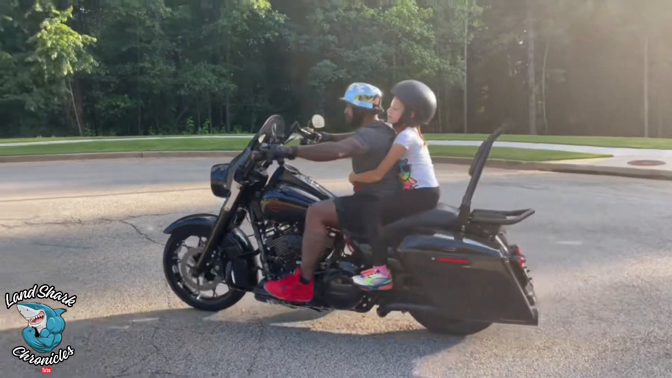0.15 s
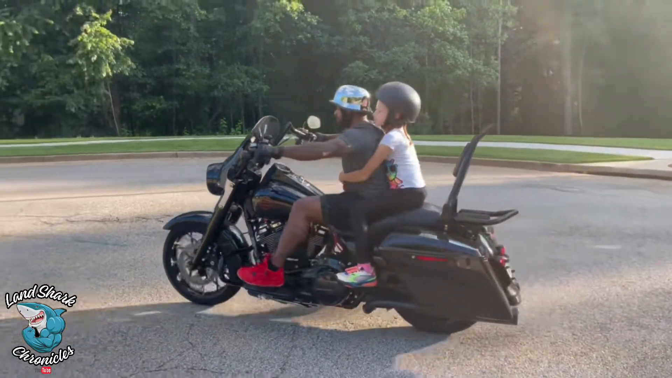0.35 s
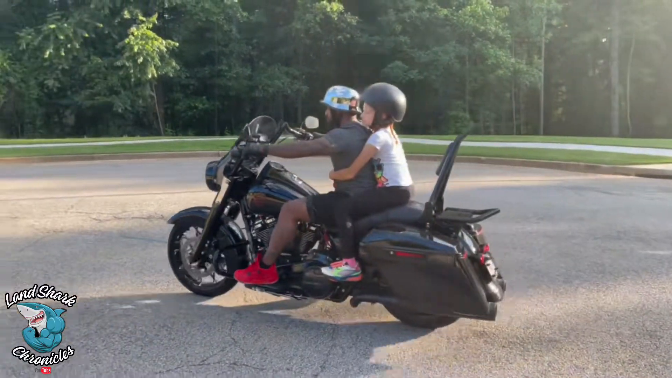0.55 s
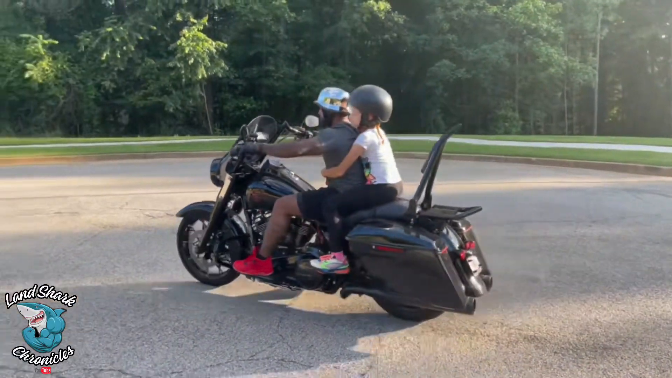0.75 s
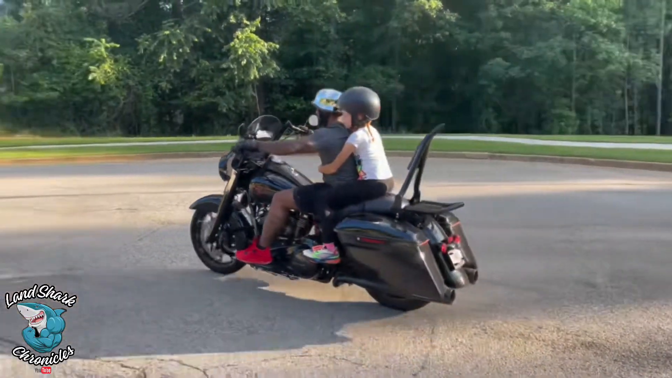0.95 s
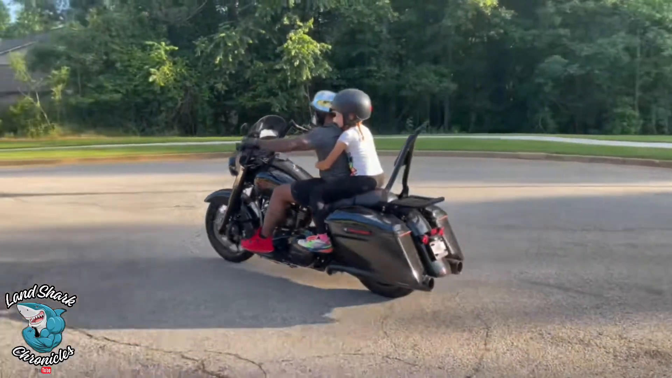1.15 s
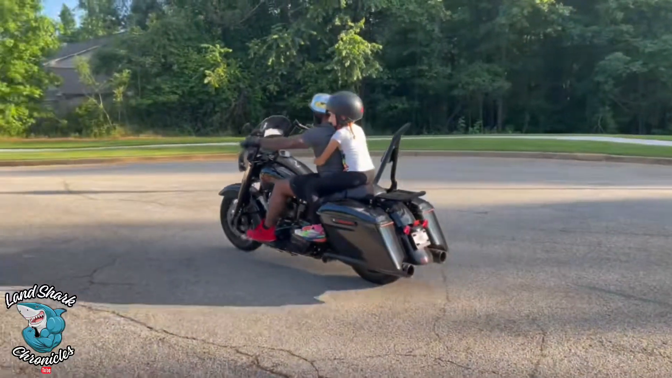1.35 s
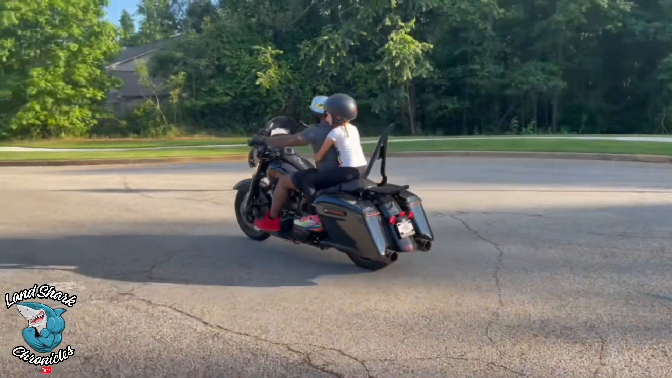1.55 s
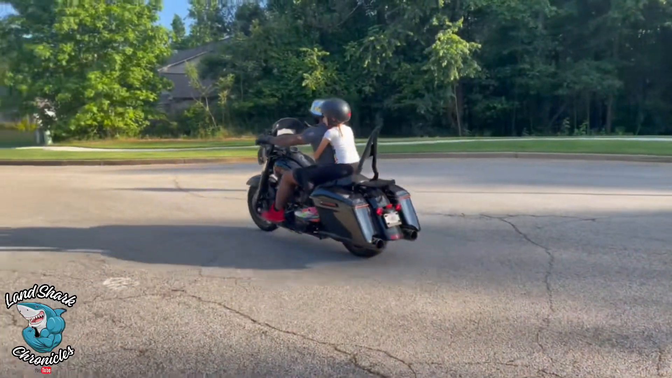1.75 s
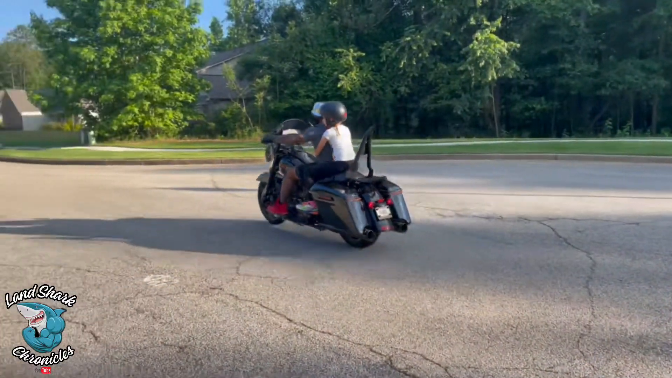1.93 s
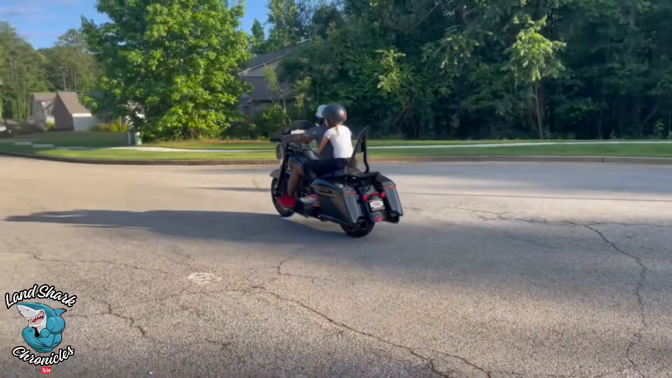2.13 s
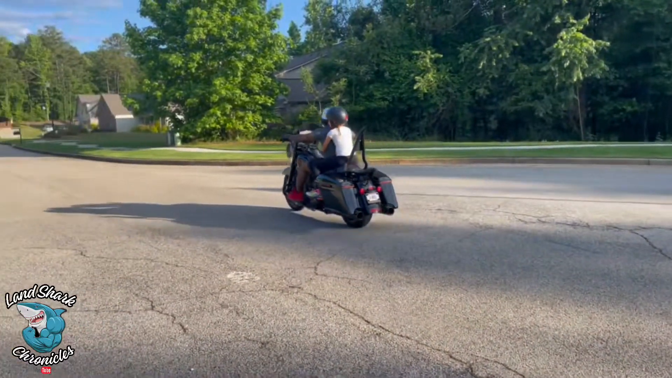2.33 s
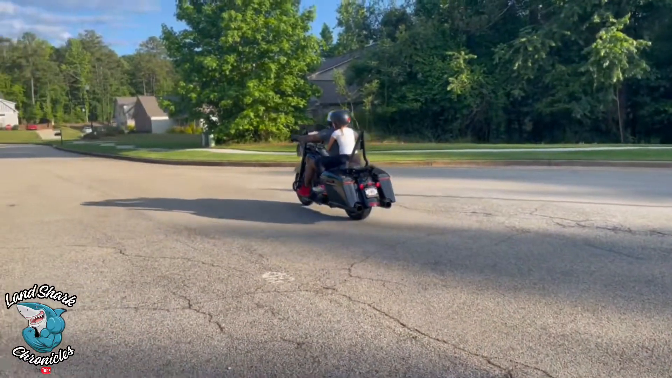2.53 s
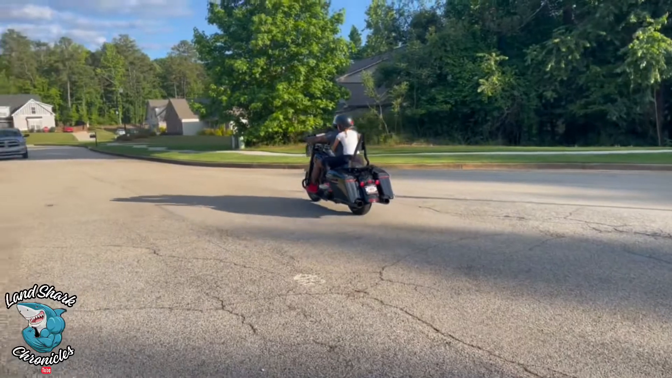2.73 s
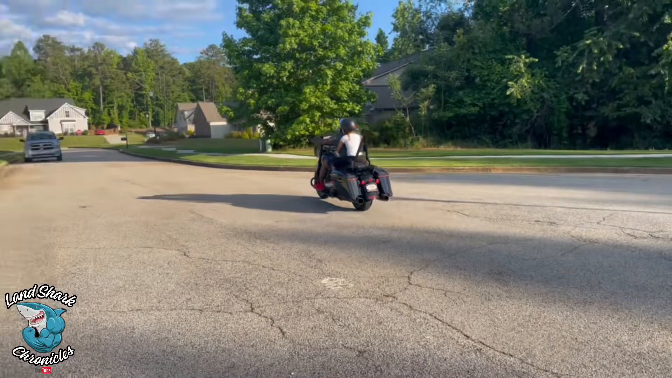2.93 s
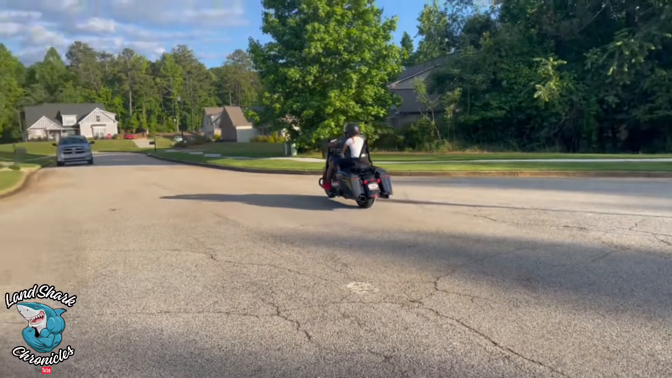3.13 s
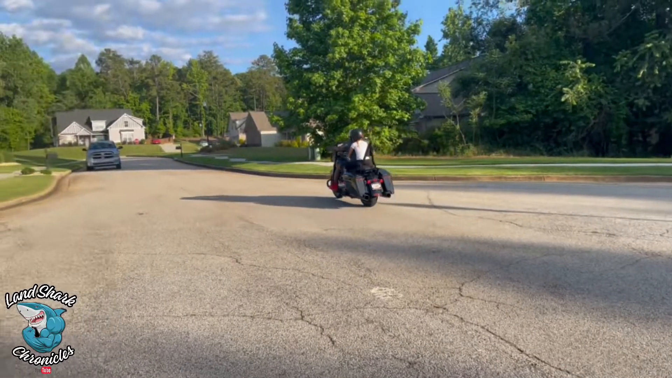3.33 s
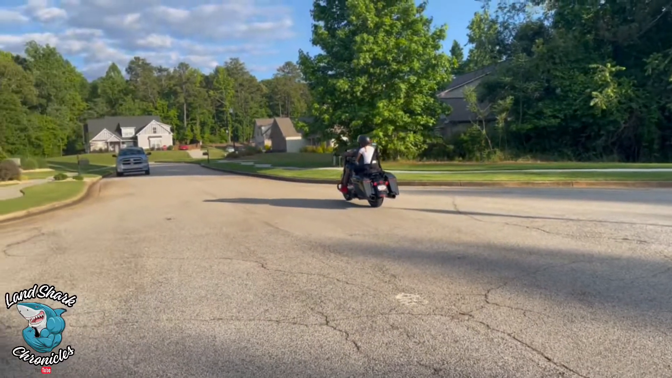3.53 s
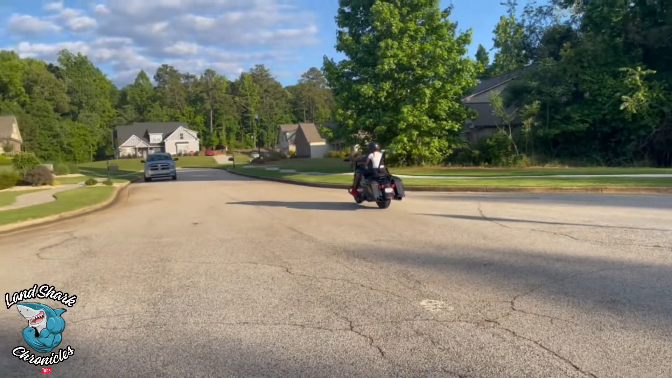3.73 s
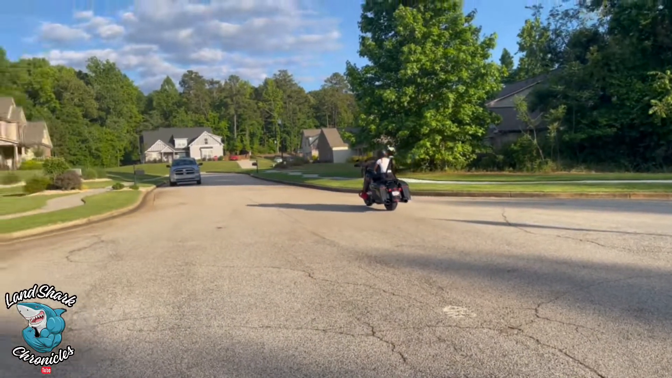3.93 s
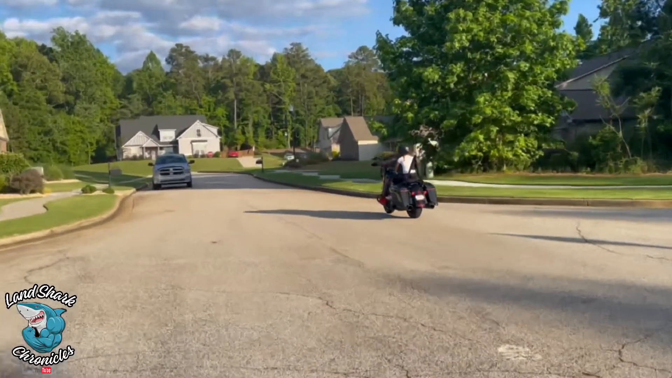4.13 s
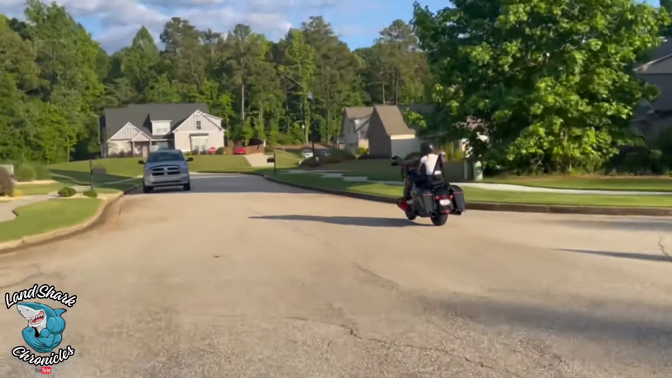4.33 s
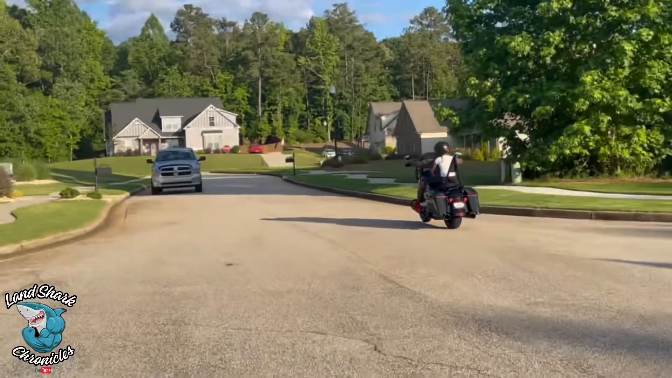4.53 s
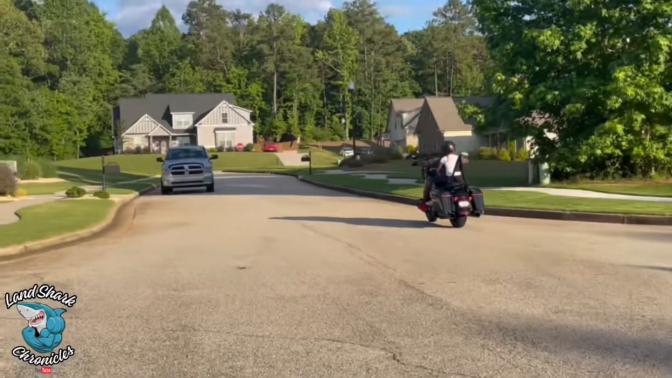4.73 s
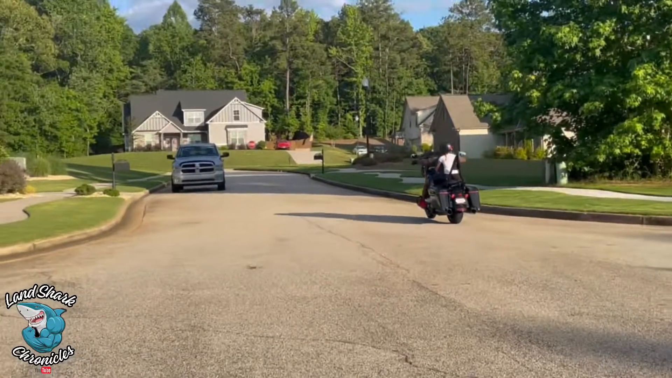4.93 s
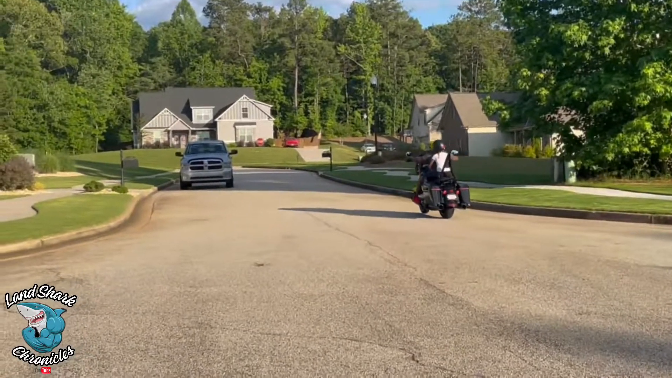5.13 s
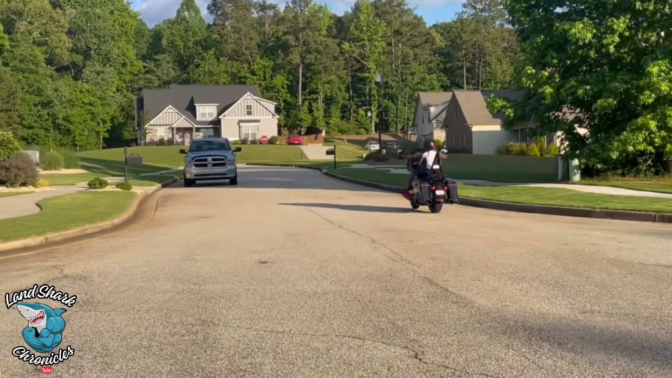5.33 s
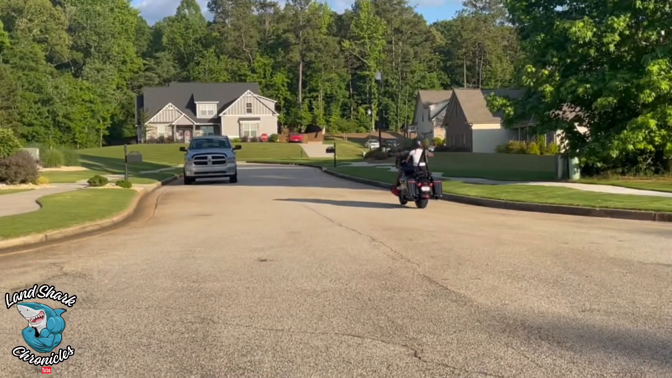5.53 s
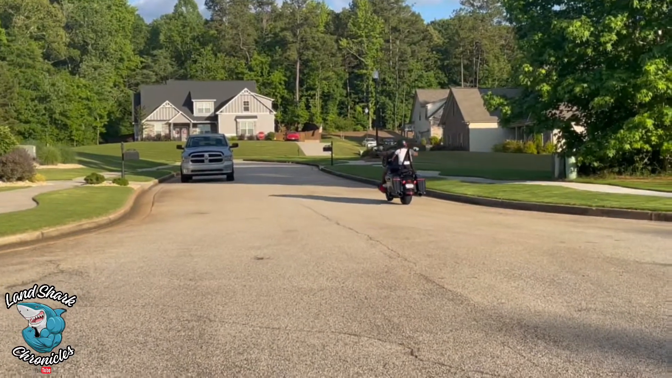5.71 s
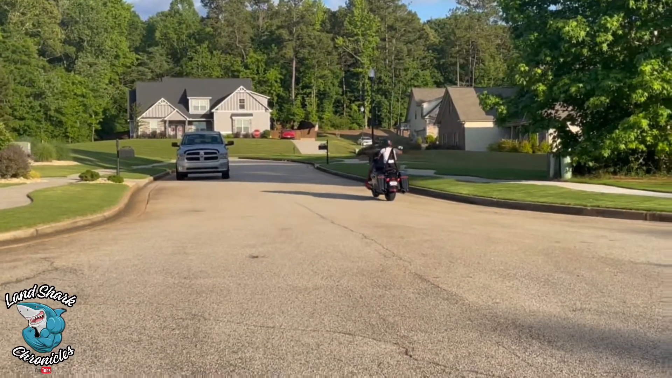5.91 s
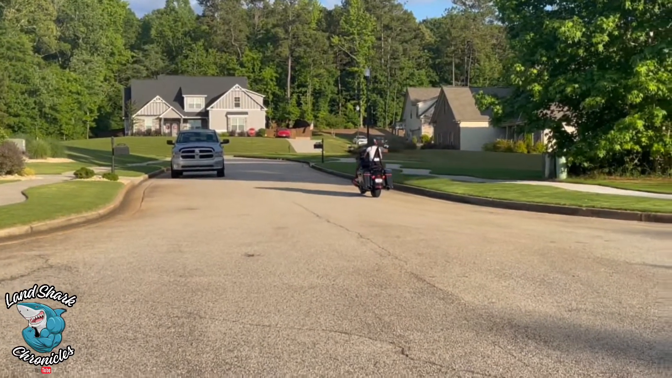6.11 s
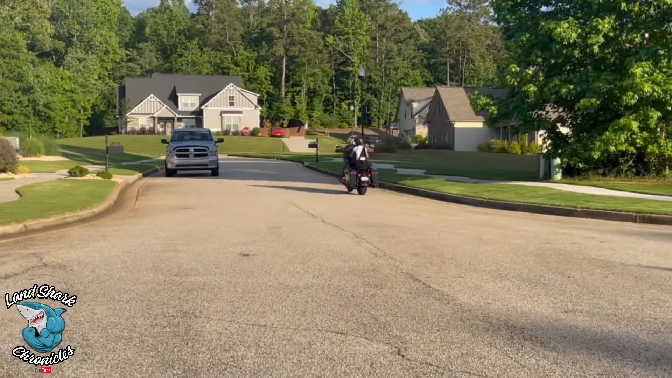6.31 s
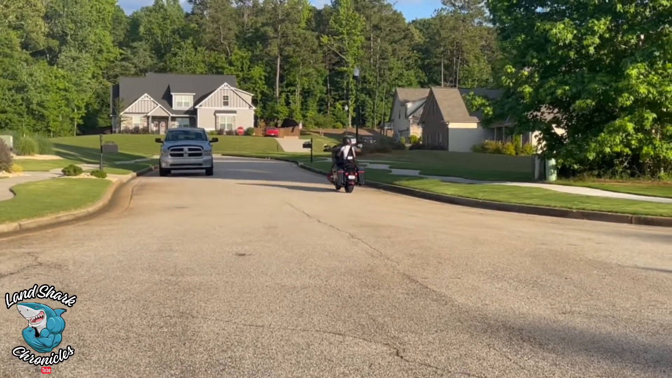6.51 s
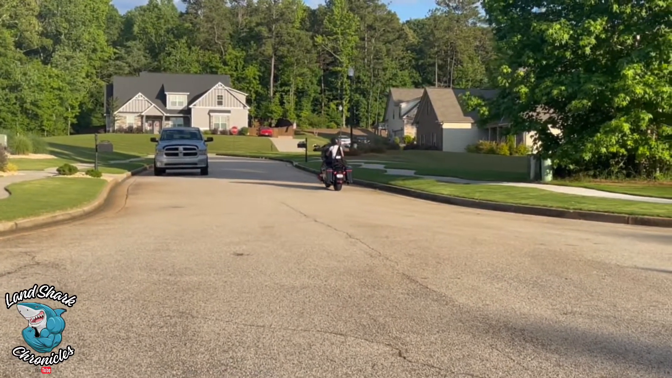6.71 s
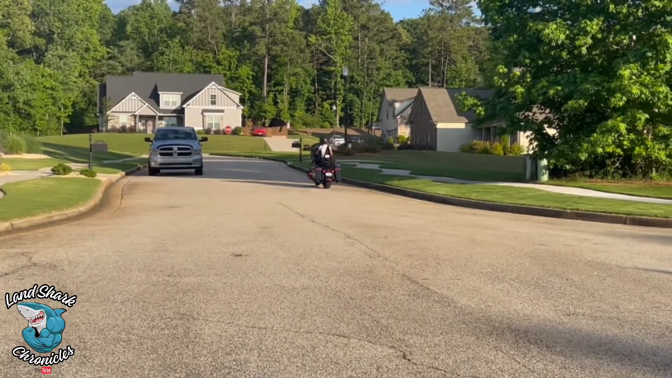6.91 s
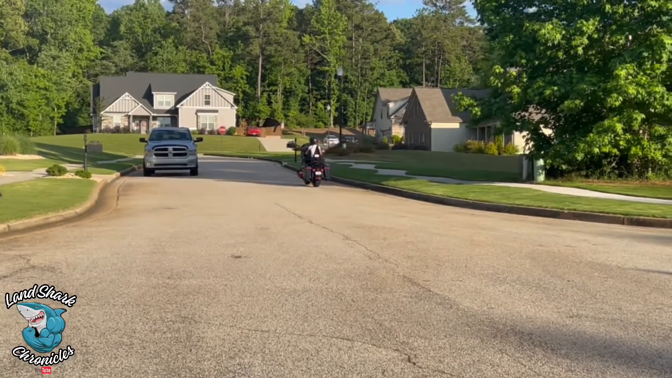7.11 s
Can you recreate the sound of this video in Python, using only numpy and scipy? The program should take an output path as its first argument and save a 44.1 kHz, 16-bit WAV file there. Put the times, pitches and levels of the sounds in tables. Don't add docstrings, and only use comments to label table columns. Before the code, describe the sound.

Outdoors on a quiet residential street, a heavy twin-cylinder motorcycle chugs in front of a small stereo microphone, then rides off. The loping low beat quickens into a hoarse, droning growl with exhaust hiss reflecting off asphalt and houses. After almost six seconds it drops off throttle, with two dull gearbox clunks and sharp crackling blips. Soft dove coos at left and a fast high bird trill join in.

```python
import sys
import numpy as np
from scipy import signal
from scipy.fft import rfft, irfft, next_fast_len
from scipy.io import wavfile
from scipy.ndimage import uniform_filter1d, map_coordinates

SR = 44100
rng = np.random.default_rng(int(sys.argv[2]) if len(sys.argv) > 2 else 0)


def volts_from_decibels(level):
    exponent = np.asarray(level, float) / 20
    return 10 ** exponent


def unload_audio(sound):
    columns = np.transpose(np.atleast_2d(sound))
    steps = np.round(np.clip(columns, -1, 1) * 32767)
    wavfile.write(sys.argv[1], SR, steps.astype(np.int16))


N = 315888
T = np.arange(N) / SR
SHUT_S, FIRST_BLIP_S = 5.87, 6.68


def unit(x):
    return x / np.sqrt(np.mean(x ** 2) + 1e-20)


def along(points, hz):
    f, v = np.transpose(points)
    return np.interp(np.log(hz + 1), np.log(f + 1), v)


def curves(rows):
    s, *columns = np.transpose(rows)
    return [np.interp(T, s, column) for column in columns]


def ramp(start_s, takes_s):
    return np.clip((T - start_s) / takes_s, 0, 1)


def filtered(x, response):
    m, fade = next_fast_len(N + SR // 2), np.hanning(8192)
    after = x[..., :-4097:-1] * fade[4096:]
    before = x[..., 4095::-1] * fade[:4096]
    gap = np.zeros(x.shape[:-1] + (m - N - 8192,))
    ends = np.concatenate([x, after, gap, before], axis=-1)
    return irfft(rfft(ends) * response(np.fft.rfftfreq(m, 1 / SR)), m)[..., :N]


def noise(spectrum, channels=1):
    return unit(filtered(rng.standard_normal((channels, N)), lambda hz: volts_from_decibels(along(spectrum, hz))))


def patchy(x, depth_db, size):
    z = signal.stft(x, nperseg=512)[2]
    field = uniform_filter1d(rng.standard_normal(z.shape), size=size, axis=0)
    field = uniform_filter1d(field, size=9, axis=1)
    return unit(signal.istft(z * volts_from_decibels(depth_db * unit(field)), nperseg=512)[1][:N])


def resonance(f, hz, width):
    return (1j * f * width / (hz * hz - f * f + 1j * f * width)) ** 2


# frequency in Hz, level in dB per Hz.
AIR_COLOUR = [(220, -51), (400, -3), (900, -15.5), (1600, -13.5), (2800, -22), (2860, -8), (2920, -24),
              (4200, -33), (6200, -24), (8500, -31), (11400, -41), (13200, -62)]


def air():
    mid, side = noise(AIR_COLOUR, channels=2)
    return volts_from_decibels(-50) * np.array([mid + 0.062 * side, mid - 0.082 * side])


# time in seconds, pitch in Hz, level in dB.
DOVE_CALLS = [
    [(2.79, 840, -45), (2.85, 900, -37), (2.91, 960, -52)],
    [(3.39, 750, -54), (3.5, 640, -49), (3.58, 730, -44), (3.68, 730, -41)],
    [(5.6, 720, -56), (5.66, 660, -50), (5.72, 600, -45)],
]


def dove():
    out = np.zeros(N)
    for call in DOVE_CALLS:
        hz, db = curves(call)
        sounding = (T > call[0][0]) * (T < call[-1][0])
        out += volts_from_decibels(db) * sounding * np.sin(2 * np.pi * np.cumsum(hz) / SR)
    return out * volts_from_decibels([[3], [-9]])


# time in seconds, level in dB.
TRILL_LEVEL = [
    (4.75, -62),
    (5.3, -55.5),
    (5.9, -52.5),
    (6.6, -52.5),
    (7.16, -46.5),
]


def trill():
    beat = (T - 6.275) / .0488
    luck = rng.standard_normal((160, 2))[np.floor(beat).astype(int) % 160]
    through = np.clip(beat % 1 / .42, 0, 1)
    hz = (5000 + 2400 * through) * (1 + .015 * luck[:, 0])
    shape = np.sin(np.pi * through ** 0.83) * (T > TRILL_LEVEL[0][0])
    return volts_from_decibels(curves(TRILL_LEVEL)[0] + 1.6 * luck[:, 1]) * shape * np.sin(2 * np.pi * np.cumsum(hz) / SR)


def trill_echoes(bird):
    return sum(volts_from_decibels(db) * np.roll(bird, round(s * SR)) for s, db in [(.0013, -27), (.0031, 4), (.007, -22)])


# frequency in Hz, seconds to fall by 60 dB.
STREET_DECAY = [(60, 1), (300, 0.69), (2000, 0.029), (10000, 0.035)]
# frequency in Hz, level in dB.
SHARED_ECHO = [(60, -26), (250, -20), (600, -12), (3000, -10), (12000, -13)]
# frequency in Hz, level in dB.
APART_ECHO = [(60, -75), (250, -30), (600, -20), (1200, -19), (3000, -5), (5000, -3), (7000, -2),
              (8800, 3.5), (9800, -7.5), (10500, -22), (11300, -16), (12500, -8)]


def street(x):
    hz, t, z = signal.stft(rng.standard_normal((2, SR // 2)), SR, nperseg=256)
    decay = volts_from_decibels(-60 * t / along(STREET_DECAY, hz)[:, None])
    tails = signal.istft(z * decay, SR, nperseg=256)[1]
    late = np.pad(x, (300, 0))[None]
    both = signal.fftconvolve(late, tails / np.linalg.norm(tails[0]), axes=1)[:, :N]
    shared = filtered(both[0], lambda f: volts_from_decibels(along(SHARED_ECHO, f)))
    apart = filtered(both[1], lambda f: volts_from_decibels(along(APART_ECHO, f)))
    return shared + np.array([apart, -apart])


def metres():
    return 3.32 + 1.9 * T ** 2 / 2


def spread_db():
    return -20 * np.log10(metres() / 3.32)


def seen():
    return 1 / (1 + np.exp((metres() - 19) / 3))


def shut():
    return ramp(SHUT_S, .08)


def blipped():
    return ramp(FIRST_BLIP_S, 0.015)


def engine_db():
    coasting_s = np.clip(T - SHUT_S, 0, FIRST_BLIP_S - SHUT_S)
    return -15.5 + 0.11 * spread_db() - shut() - 15.5 * coasting_s + 4.5 * blipped()


# time in seconds, frequency in Hz.
ECHO_PEAK_HZ = [(0, 1690), (1, 1950), (1.5, 2590), (2, 3010), (2.5, 4000), (2.8, 4560), (3.2, 5530),
                (3.7, 5900), (4.2, 8700), (5, 11000)]


def off_asphalt(x, share):
    lag = SR / curves(ECHO_PEAK_HZ)[0]
    echo = map_coordinates(x, [np.arange(N) - lag])
    steep = np.clip(lag / 16, 0, 1)
    out = x + share * seen() * (steep * uniform_filter1d(echo, size=5) + (1 - steep) * echo)
    treble = filtered(out, lambda hz: 1 / (1 + (8500 / (hz + 1)) ** 6))
    return out - np.clip(0.044 * (metres() - 49), 0, 0.17) * treble


# time in seconds, level in dB.
WHIR_LEVEL = [
    (4.2, -60),
    (4.9, -51.5),
    (5.5, -54),
    (6.3, -57),
]


def whir():
    colour = [(2200, -27), (3300, -1), (5500, -2), (7500, -16), (13000, -83)]
    return volts_from_decibels(curves(WHIR_LEVEL)[0]) * noise(colour)[0]


# time in seconds, level in dB, seconds to fall by 60 dB.
CLUNKS = [
    (6.189, -37.5, 0.25),
    (6.786, -39.5, 0.14),
]


def clunks():
    colour = [(250, -29), (500, 8), (2500, -1.0), (5000, -10.5), (13000, -94)]
    knocks = sum(volts_from_decibels(db - 60 * np.abs(T - s) / np.where(T > s, t60, .06)) for s, db, t60 in CLUNKS)
    return knocks * noise(colour)[0]


# time in seconds, engine cycles per second.
ENGINE_SPEED = [(0.0, 8.07), (0.18, 8.68), (0.54, 7.49), (0.72, 8.06), (1.44, 7.56), (1.8, 8.28),
                (2.85, 10.06), (3.3, 10.42), (4.2, 11.78), (4.65, 12.31), (5.88, 13.35), (6.25, 10.52),
                (6.6, 8.77), (6.8, 9.5), (7.0, 8.85), (7.17, 9.82)]


def revs():
    return curves(ENGINE_SPEED)[0]


def firings():
    cycle = -.445 + np.cumsum(revs()) / SR
    rear_share = 157.5 / 360
    return [np.flatnonzero(np.diff(np.floor(cycle - share), prepend=-1 - (share > 0)))
            for share in (0, rear_share)]


def gas_puffs(fires):
    gate, t = np.zeros(N), np.arange(2000) / SR
    rear_db = -0.5 - 4 * (1 - seen()) * (T < SHUT_S)
    for at, db in zip(fires, (0, rear_db[fires[1]])):
        gate[at] = volts_from_decibels(db + 1.2 * rng.standard_normal(len(at)))
    puff = t ** 2 * np.exp(-t / .0022)
    return unit(signal.fftconvolve(gate, puff)[200:N + 200])


# frequency in Hz, level in dB per Hz.
ROAR_COLOUR = [(220, 14.5), (380, -5), (480, -1), (600, 0), (730, 1.5), (900, -3.5), (1080, -0.5),
               (1450, -2), (1750, 1), (2050, -5), (3130, -8.5), (3480, -15), (6210, -22), (9130, -23),
               (10100, -13.5), (11200, -15), (12100, -26.5), (13200, -80)]


def roar(gate):
    level_db = engine_db() - 11 + 0.55 * spread_db() - 4 * shut()
    rush = patchy(noise(ROAR_COLOUR)[0], depth_db=1, size=8)
    return volts_from_decibels(level_db) * off_asphalt((1 + .4 * gate) * rush, share=.4)


# frequency in Hz, width in Hz, level in dB.
TIP_MODES = [(1950, 360, 5), (2876, 350, 4.5), (3210, 97, 3), (3790, 270, 1.5), (4780, 200, -3),
             (6270, 180, -14)]


def tips(gate):
    body = lambda f: sum(volts_from_decibels(db) * resonance(f, hz, width) for hz, width, db in TIP_MODES)
    return unit(filtered(gate * rng.standard_normal(N), body))


# start in seconds, length in seconds, level of the spit in dB.
THROTTLE_BLIPS = [
    (6.68, .1, 18),
    (6.78, .16, 13),
    (6.94, .07, 15),
    (7.01, .05, 20),
    (7.06, .05, 21),
    (7.11, .1, 18),
]


def spitting_db():
    shut_db = -11
    blips = sum((db - shut_db) * (T > s) * (T < s + length) for s, length, db in THROTTLE_BLIPS)
    turning = -31.5 * (1 + np.cos(np.pi * ramp(0, 1.91))) / 2
    return -32 + turning + spread_db() + 0.5 * (1 - seen()) + shut_db * shut() + blips


# frequency in Hz, level in dB per Hz.
NEAR_SPIT = [(300, -30), (480, 2.5), (600, -19), (740, 11), (1000, -65), (1800, -7), (2250, -9), (2800, 2),
             (3200, 6.5), (3450, -11.5), (3700, 1.5), (4200, -6), (5000, 1.5), (5600, -2.5), (6200, -0.5),
             (8000, -9), (11000, -2.5), (12200, -10), (13000, -31), (13500, -86)]
# frequency in Hz, level in dB per Hz.
FAR_SPIT_COLOUR = [(300, -36), (500, 19), (1100, -17), (1700, -10), (2900, 4.5), (3600, -4), (5400, 2),
                   (6500, -2), (8500, -9), (11500, -16), (13000, -40), (13500, -89)]
# time in seconds, extra spit in dB, ring of the pipe tips in dB.
PIPE_AIM = [(0, -15, -50), (.7, 3, -33), (1.05, 0, -8.5), (1.5, -6, -1.5), (2.6, -1.5, -4.5), (3.2, 2, -18),
            (3.6, 2, -12), (3.8, -1.5, -22), (4.7, -2, -10), (5, 3, -16), (5.4, -1, -9), (5.85, 2, -20),
            (5.95, -6, -42)]


def spit(gate):
    gas = np.sqrt(seen()) * noise(NEAR_SPIT)[0] + np.sqrt(1 - seen()) * noise(FAR_SPIT_COLOUR)[0]
    gas = gate * patchy(gas, depth_db=2.5, size=3)
    bounced = off_asphalt(off_asphalt(gas, share=.8), share=.5)
    aim_db, ring_db = curves(PIPE_AIM)
    ring = volts_from_decibels(-32 + spread_db() + ring_db) * off_asphalt(tips(gate), share=0.99)
    return volts_from_decibels(aim_db + spitting_db() + 0.47) * bounced + ring


def ringing(fires, modes):
    m = next_fast_len(N + SR // 2)
    f = np.fft.rfftfreq(m, 1 / SR)
    uneven_db = .4 + .6 * shut()
    out = 0
    for hz, width, front_db, rear_db, front_ms, rear_ms in modes:
        blows = np.zeros(N)
        for at, db, ms in zip(fires, (front_db, rear_db), (front_ms, rear_ms)):
            luck = uneven_db[at, None] * rng.standard_normal((len(at), 2))
            late = (ms / 1000 + luck[:, 0] / 10000) * SR
            blows[np.clip(at + late.astype(int), 0, N - 1)] = volts_from_decibels(db + luck[:, 1])
        out = out + rfft(blows, m) * resonance(f, hz, width)
    out = irfft(out, m)[:N]
    return out / np.sqrt(np.abs(uniform_filter1d(out ** 2, SR // 2)) + 1e-20)


# frequency in Hz, width in Hz, front level in dB,
# rear level in dB, front start and rear start in milliseconds after the valve opens.
BOOM_MODES = [(53, 19, -8, -6, 19, -4), (66, 20, 0, 0, 6, 5.2), (89, 26, -7, -9, -2.2, -2.5)]
BARK_MODES = [(113, 21, 0, -1, 3.8, 3)]
YELP_MODES = [(140, 34, 0, -1, 13.4, 4)]
GROWL_MODES = [(176.1, 17.4, 6, 20, 0, -1.54), (208.6, 39.6, 5.7, 0.76, -2.5, 0.63)]
RASP_MODES = [(242.6, 49.6, 16.15, 13.64, -2, 1), (281, 21.4, 1, 8.2, -3, -0.97)]
CHUG_MODES = [(323.6, 48, 8, 13.5, 3, -1), (468.4, 115, 10, -5, -2.5, -5.5), (730, 32, 4, 0, -3, 0.5),
              (1094, 210, -6.5, -6.5, -5, -4)]


def exhaust(fires):
    speed = revs()
    bark_db = np.maximum(3 - 3.5 * (speed - 8), -5.5)
    yelp_db = -12.5 + 1.42 * (speed - 10.0)
    rasp_db = -21 + 8.5 * np.exp(-((speed - 12.54) / 1.01) ** 2 / 2)
    chug_db = -18.5 + 0.7 * spread_db() + 6.5 * shut() + 7 * blipped()
    pipes = ringing(fires, BOOM_MODES)
    pipes = pipes + volts_from_decibels(bark_db) * ringing(fires, BARK_MODES)
    pipes = pipes + volts_from_decibels(-9) * ringing(fires, GROWL_MODES)
    pipes = pipes + volts_from_decibels(rasp_db) * ringing(fires, RASP_MODES)
    pipes = pipes + volts_from_decibels(yelp_db) * ringing(fires, YELP_MODES)
    pipes = pipes + volts_from_decibels(chug_db) * ringing(fires, CHUG_MODES)
    return volts_from_decibels(engine_db()) * pipes


# harmonic of the engine cycle, level in dB.
IDLE_ORDERS = [(3, 14), (4, 0), (7, -1.5), (8, 4.5), (9, 3), (10, -13), (11, -4.5), (12, -1), (13, 0.5),
               (14, -4.5), (15, 9.5), (16, 0.5), (17, 2.5), (18, 3.5), (19, -1), (20, 1), (21, 5),
               (22, 1.5), (23, 1.5), (26, -11), (29, 2)]
PULLING_ORDERS = [2, -2, 1, 7, 2, 5, -16, -3, -2, 5, 2, -5, 5, -10, 6, 5.5, -3, 10, -13, -4, 2, 4, 5.5, 5.5,
                  5, 7.5, 2]
CLIMBING_ORDERS = [-2, -1, -3, -1, 1.5, 2, -13, -9, 8, 4.5, -1, -16, 4.5, -10, 5, 8, -10, 16.5, 3, -3, 2, 1,
                   3, -2, -9, 5, 5]
RUNNING_ORDERS = [2, 6, 0.5, -3, -0.5, 4, -11.5, -4.5, 8, 0.5, 5, -0.5, 3, 0, 3, 12.5, -10, 18, 1.5, 4, -5,
                  10.5, -7, 7, -5, 0, -3.5]
COASTING_ORDERS = [-2, 8, -9, 13, 1.5, 14.5, -3, -3, -1.5, -5, 6.5, 3, 3, 5, 1, 12, 2, 9.5, -4, 7.5, 4, 3,
                   -1, 2, 8, 2, 8]


def weigh_harmonics(x):
    steps = 1024
    cycle = np.cumsum(revs()) / SR
    angle = np.arange(int(cycle[-1] + 2) * steps) / steps
    turned = rfft(np.interp(np.interp(angle, cycle, T), T, x))
    order = np.fft.rfftfreq(len(angle), 1 / steps)

    def change(orders, db):
        gain = volts_from_decibels(np.interp(order, orders, db, left=0, right=0)) - 1
        return np.interp(cycle, angle, irfft(turned * gain, len(angle)))

    out = change(*np.transpose(IDLE_ORDERS))
    stages = [(PULLING_ORDERS, 1.85, 1),
              (CLIMBING_ORDERS, 2.8, 0.8),
              (RUNNING_ORDERS, 3.8, 0.51),
              (COASTING_ORDERS, SHUT_S, .2)]
    for table, start_s, takes_s in stages:
        out = out + ramp(start_s, takes_s) * (change(np.arange(3, 30), table) - out)
    return x + out


def scene():
    fires = firings()
    gate = gas_puffs(fires)
    bird = trill()
    pipes = weigh_harmonics(exhaust(fires))
    ahead = pipes + spit(gate) + roar(gate) + whir() + clunks() + bird
    bass = filtered(pipes, lambda hz: 1 / (1 + (hz / 149) ** 4))
    sent = ahead * volts_from_decibels(-0.011 * spread_db()) + volts_from_decibels(5.5) * ramp(SHUT_S, 0.17) * bass
    return ahead + street(sent) + trill_echoes(bird) + air() + dove()


# frequency in Hz, left minus right in dB.
PORT_LEAN = [(60, 1.0), (110, 0.5), (200, -0.5), (360, -2.0), (650, -2.5), (1180, -4.0), (2140, -4.5),
             (3880, -2.0), (7050, 0.0), (12800, 0.0)]
# frequency in Hz, lead of the left in radians.
PORT_PHASE = [(60, -.2), (130, -.35), (500, -.4), (1200, 0), (1900, -.4), (2600, .1), (4000, .1),
              (4600, .7), (5400, -.8), (6100, .8), (7000, -.4), (7900, .1), (8900, -.7), (9800, -3),
              (10450, -3.25), (11700, -6.28)]


def microphones(dry):
    half = lambda hz: volts_from_decibels(along(PORT_LEAN, hz) / 2) * np.exp(.5j * along(PORT_PHASE, hz))
    low_cut = lambda hz: 1 + (32 / (hz + 1)) ** 6
    return filtered(dry, lambda hz: np.array([half(hz), 1 / half(hz)]) / low_cut(hz))


MONO_BAND = 3700, 9000


def narrowed(pair):
    side = (pair[0] - pair[1]) / 2
    band = filtered(side, lambda hz: (hz > MONO_BAND[0]) * (hz < MONO_BAND[1]))
    lost = (1 - volts_from_decibels(-30)) * ramp(4, .25) * (T < FIRST_BLIP_S) * band
    return pair - np.array([lost, -lost])


def roll_off(x):
    return signal.sosfilt(signal.butter(12, 13390, fs=SR, output="sos"), x)


def record(dry):
    ports = narrowed(microphones(dry))
    rounded = ports / (1 + np.abs(ports / .97) ** 6) ** (1 / 6)
    finished = rounded * (1 - ramp(T[-1] - .004, .004))
    return roll_off(finished)


dry = scene()
out = record(dry)
unload_audio(out)
```